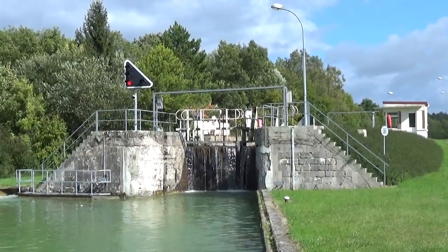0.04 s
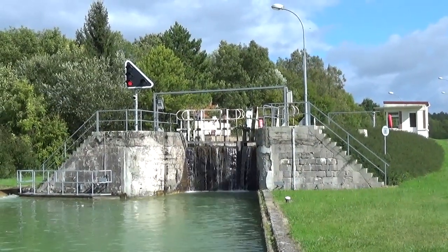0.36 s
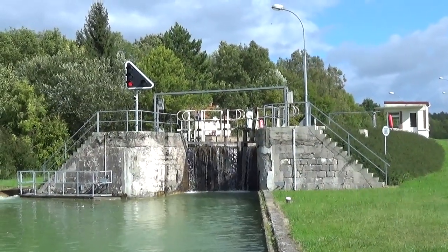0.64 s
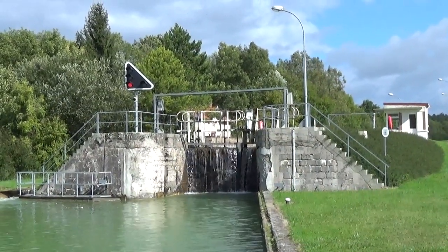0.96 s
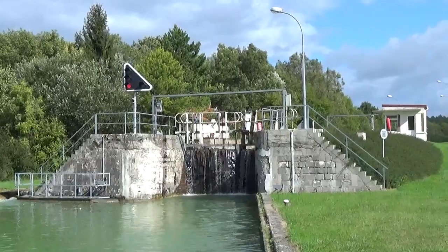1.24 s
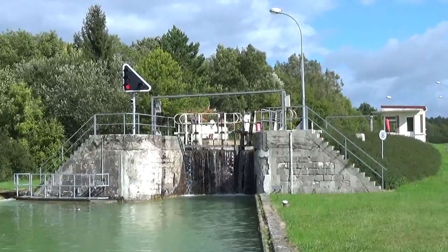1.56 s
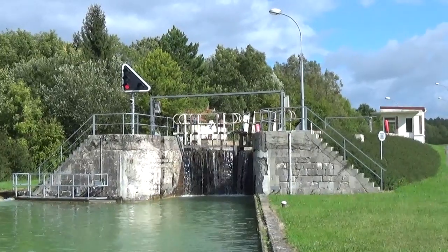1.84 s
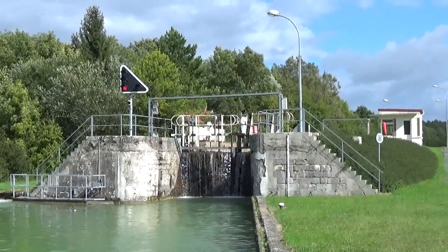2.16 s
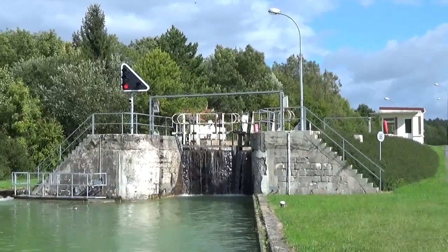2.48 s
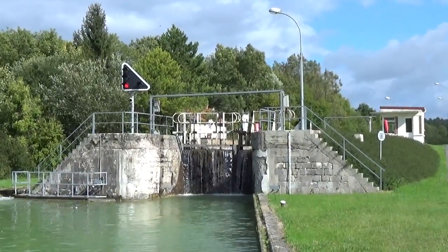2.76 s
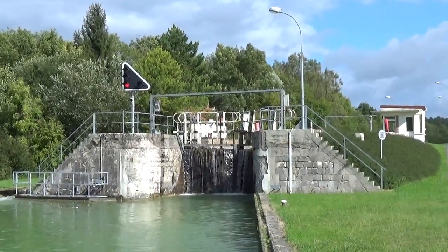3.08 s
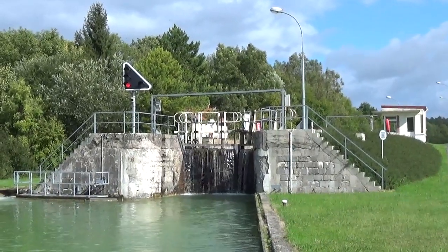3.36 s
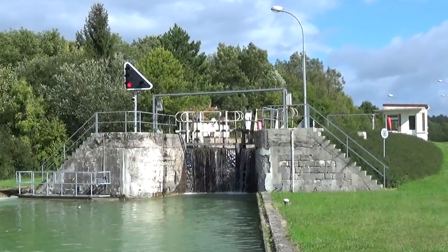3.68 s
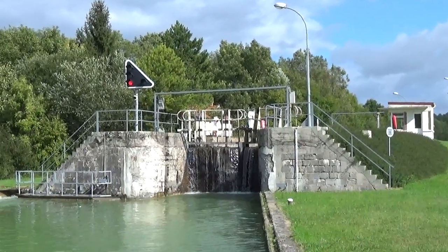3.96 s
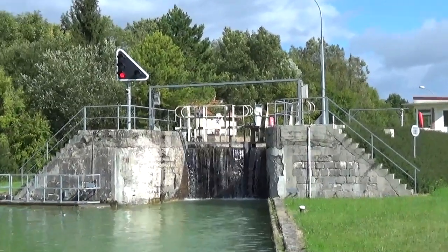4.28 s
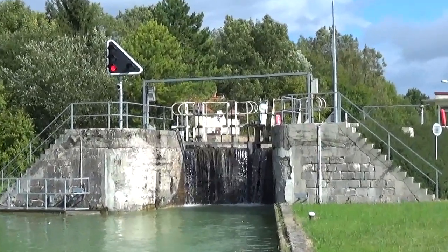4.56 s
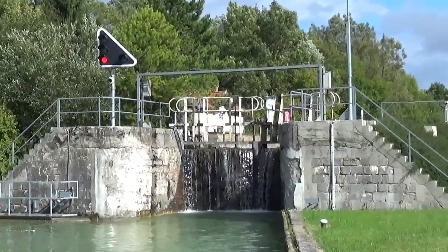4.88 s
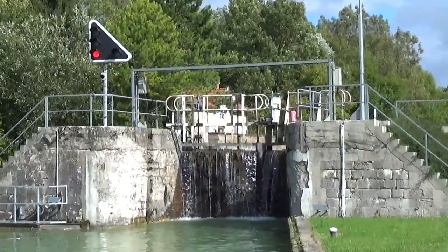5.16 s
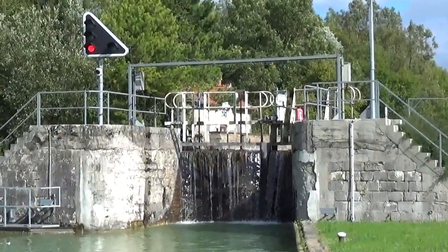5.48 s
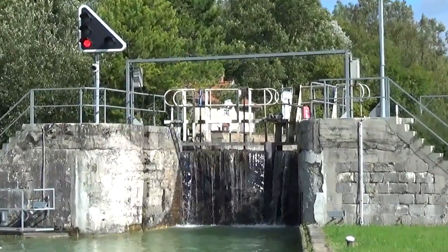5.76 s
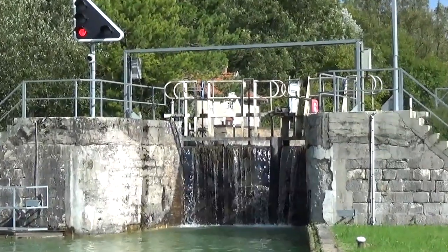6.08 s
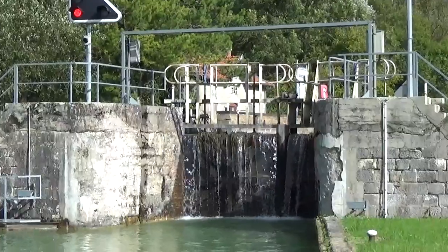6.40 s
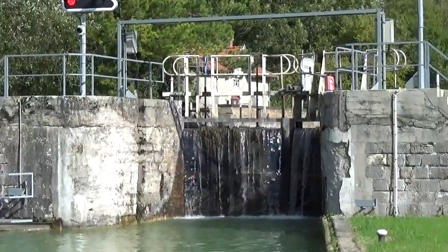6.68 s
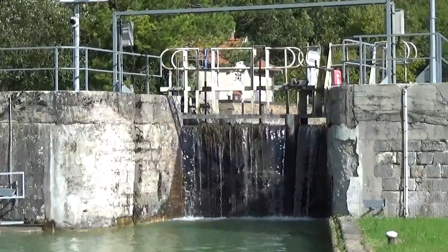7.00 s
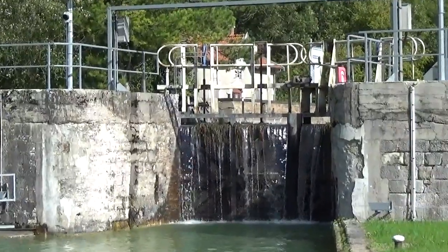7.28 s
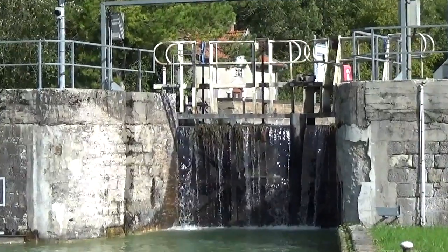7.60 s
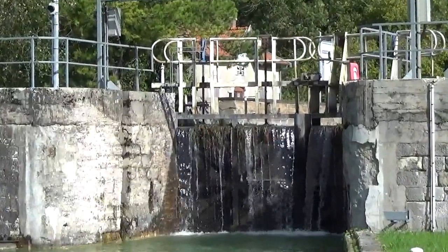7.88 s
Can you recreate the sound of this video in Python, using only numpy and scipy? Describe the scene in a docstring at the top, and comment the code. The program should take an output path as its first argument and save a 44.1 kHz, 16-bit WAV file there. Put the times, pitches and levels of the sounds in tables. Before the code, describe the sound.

A dense, even rush of falling water and spattering spray at a canal lock, heard from the bank in a light breeze.

```python
"""A steady hiss and churn of water falling over a canal lock gate, heard from the bank.
The fall is straight ahead: ropes of water plunge into the pool and drive bubbles under,
while spray hisses and spatters on top. The stone walls spread it into a wide wash.
Now and then a light breeze puffs at the microphone."""
import sys
import numpy as np
from scipy import signal
from scipy.fft import rfft, irfft, next_fast_len
from scipy.io import wavfile
from scipy.ndimage import uniform_filter1d, map_coordinates

SR = 44100
rng = np.random.default_rng(int(sys.argv[2]) if len(sys.argv) > 2 else 0)


def transcribe(signal):
    """Save signal, clipped to [-1, 1], as a 16-bit WAV file at the path in sys.argv[1]."""
    frames = np.atleast_2d(signal).T
    limited = np.clip(frames, -1, 1)
    pcm = np.round(limited * 32767).astype(np.int16)
    wavfile.write(sys.argv[1], SR, pcm)


N = 358974


def amp(db):
    """Decibels to gain."""
    return 10 ** (np.asarray(db) / 20)


def unit(x):
    """Scale to rms 1."""
    return x / np.sqrt(np.mean(x ** 2) + 1e-20)


def colour(points, hz):
    """Gain at hz of (Hz, dB) points joined on a log axis."""
    point_hz, db = np.transpose(points)
    return amp(np.interp(np.log(hz + 1), np.log(point_hz + 1), db))


def swell(peak_s, half_width_s):
    """A bell curve in time: 1 at its peak, 1/e a half width away."""
    return np.exp(-((np.arange(N) / SR - peak_s) / half_width_s) ** 2)


def wobble(rate_hz):
    """A smooth random curve, rate_hz knots a second."""
    knots = rng.standard_normal(int(N * rate_hz / SR) + 4)
    return map_coordinates(knots, [np.arange(N) * rate_hz / SR])


def filtered(x, response):
    """Pass x through a complex response, a function of frequency in Hz."""
    padded = next_fast_len(N + SR // 2)
    hz = np.fft.rfftfreq(padded, 1 / SR)
    return irfft(rfft(x, padded) * response(hz), padded)[..., :N]


def breeze(apart=0.47, stir_db=-65.0, lull_db=15, swing_db=6.0):
    """Soft low puffs over faintly stirring air, a little different at each microphone port."""
    # puffs on the microphone: peak_s, level_db, half_width_s
    puffs = [(2.407, -46, 0.034), (3.49, -46.5, 0.027), (4.82, -50, 0.044), (5.428, -44, 0.023),
             (5.497, -41, 0.031), (5.552, -39, .02), (5.66, -46, 0.054)]
    # spectrum of the buffeting air: frequency_hz, relative_db
    buffet = [(20, -26), (60, -8), (110, -1.5), (180, -2.5), (300, -4), (700, -38), (2000, -120)]
    puffing = sum(amp(db) * swell(s, half_width) for s, db, half_width in puffs)
    lull = swell(peak_s=3.4, half_width_s=1.2)
    stir = amp(stir_db - lull_db * lull + swing_db * wobble(rate_hz=12.0))
    air = rng.standard_normal(N) + apart * rng.standard_normal((2, N))
    return np.hypot(puffing, stir) * unit(filtered(air, lambda hz: colour(buffet, hz)))


def wash():
    """Countless reflections from walls and trees blur into noise, unrelated left and right."""
    # spectrum of the reflected water sound: frequency_hz, relative_db
    walls = [(25, -30), (110, -14), (210, -7), (390, -7), (530, 2.5), (1050, 3.5), (2000, 0.9),
             (3800, -0.5), (5600, 0), (7200, 2.5), (8500, 1.5), (10900, -4.5)]
    return unit(filtered(rng.standard_normal((2, N)), lambda hz: colour(walls, hz)))


def recess(hz):
    """The stone bay around the gate lifts a few hollow resonances."""
    # resonances of the bay: centre_hz, width_hz, lift_db
    resonances = [(180, 36, 5), (745, 270, 5), (1212, 330, 7), (1870, 410, 5.5), (2493, 220, 3),
                  (3860, 170, 1)]
    return amp(sum(db / (1 + (2 * (hz - centre) / width) ** 2) for centre, width, db in resonances))


def at_microphone(hz, bounce=0.23, dull_hz=7000, delay_s=0.001212):
    """Response on the bank: the direct sound plus a ground bounce that ripples the spectrum."""
    # spectrum of the direct water sound, with the microphone's bright resonance near 9 kHz:
    # frequency_hz, relative_db
    direct = [(25, -40.4), (65, -30), (140, -19), (170, -15.5), (330, -8), (420, -12.5), (520, -4.5),
              (1000, -8), (1900, -8), (3000, -8), (6900, -7.5), (8000, -1.7), (9300, 0.0), (10900, -9)]
    echo = bounce / (1 + (hz / dull_hz) ** 4) * np.exp(-2j * np.pi * hz * delay_s)
    return colour(direct, hz) * recess(hz) * (1 + echo)


def churn_share(hz, split_hz=2800):
    """Share of the power that is churn, mostly below the split; the rest is spray."""
    return 1 / (1 + (hz / split_hz) ** 8)


def rush(patchy_db):
    """Rushing water: white noise whose bands swell and sink in short patches."""
    spectra = signal.stft(rng.standard_normal(N), nperseg=512)[2]
    patches = uniform_filter1d(rng.standard_normal(spectra.shape), size=7, axis=0)  # across bands
    patches = uniform_filter1d(patches, size=12, axis=1)  # along time
    return unit(signal.istft(spectra * amp(patchy_db * unit(patches)), nperseg=512)[1][:N])


def bubbles(count, low_hz, high_hz, cycles, rise, spread_db):
    """Bubbles ring as damped sines, each rising in pitch as it nears the surface."""
    when, pitch, loudness = rng.random((count, 3)).T[:, :, None]
    hz = low_hz * (high_hz / low_hz) ** pitch
    offsets = np.arange(SR // 30)
    age = hz * offsets / SR / cycles  # 1 after `cycles` periods of the starting pitch
    envelope = np.exp(-2 * age) * (1 - np.exp(-20 * age))
    ring = np.sin(2 * np.pi * cycles * age * (1 + rise * age / 2)) * envelope
    # small bubbles are brief, so they start stronger for an even spectrum
    strength = hz * amp(spread_db * loudness)
    samples = (when * N).astype(int) + offsets
    return unit(np.bincount(samples.ravel(), (strength * ring).ravel(), N)[:N])


def impacts(count, spread_db):
    """Sharp ticks of water hitting the pool: many small, a few large."""
    when, size, sign = rng.random((count, 3)).T
    strength = amp(spread_db * size ** 2) * np.sign(sign - .5)
    return unit(np.bincount((when * N).astype(int), strength, N))


def churn(slaps, bubble_db=-15, slap_db=-15):
    """The plunge drives air under water: a roar with gurgling bubbles in it."""
    gurgle = bubbles(count=3300, low_hz=478.6, high_hz=2827, cycles=12.0, rise=0.056, spread_db=8.0)
    source = rush(patchy_db=0.5) + amp(bubble_db) * gurgle + amp(slap_db) * slaps
    return unit(filtered(source, lambda hz: at_microphone(hz) * np.sqrt(churn_share(hz))))


def spray(slaps, drop_db=-4, slap_db=-20, flutter_db=0.4, drift_db=0.34):
    """Fine drops and bursting foam hiss, fluttering as the ropes of water break up."""
    foam = rush(patchy_db=0.86)
    drops = impacts(count=50000, spread_db=5.5)
    source = foam + amp(drop_db) * drops + amp(slap_db) * slaps
    hiss = filtered(source, lambda hz: at_microphone(hz) * np.sqrt(1 - churn_share(hz)))
    return unit(hiss) * amp(flutter_db * wobble(rate_hz=55) + drift_db * wobble(rate_hz=5))


def flow_gains(even_churn_db=-29, even_spray_db=-23.0, churn_follows=0.34):
    """Gains of churn and spray: spray follows the spill in full, churn in part; surges lift both."""
    # the spill runs evenly, sinks once and partly recovers: time_s, flow_change_db
    spill = [(5.65, 0), (6.25, -2), (7.2, -0.5)]
    # more water slops over the gate: peak_s, churn_lift_db, spray_lift_db, half_width_s
    surges = [(1.75, 0.7, 0.7, .45), (3.6, 0.5, 2.1, .18), (5.3, 1.2, 0.8, .3)]
    flow_db = np.interp(np.arange(N) / SR, *np.transpose(spill))
    churn_lift_db = sum(db * swell(s, half_width) for s, db, _, half_width in surges)
    spray_lift_db = sum(db * swell(s, half_width) for s, _, db, half_width in surges)
    churn_db = even_churn_db + churn_follows * flow_db + churn_lift_db
    spray_db = even_spray_db + flow_db + spray_lift_db
    return amp(churn_db), amp(spray_db)


def scene(wash_db=-12.5, churn_pan_db=0.13):
    """From the bank, the fall stands straight ahead, inside its own wash."""
    churn_gain, spray_gain = flow_gains()
    # heavy gobs of water slap the pool across the whole spectrum
    slaps = impacts(count=400, spread_db=13.0)
    deep = churn_gain * churn(slaps) * amp(churn_pan_db * np.array([[1], [-1]]))
    bright = spray_gain * spray(slaps)
    # the wash follows the level of the fall, smoothed over half a second
    fall_gain = uniform_filter1d(np.hypot(churn_gain, spray_gain), size=SR // 2)
    around = amp(wash_db) * fall_gain * wash()
    return deep + bright + around + breeze()


def record(dry, top_hz=11020):
    """The camera on the bank keeps nothing above its band limit."""
    return filtered(dry, lambda hz: hz < top_hz)


dry = scene()
out = record(dry)
transcribe(out)
```